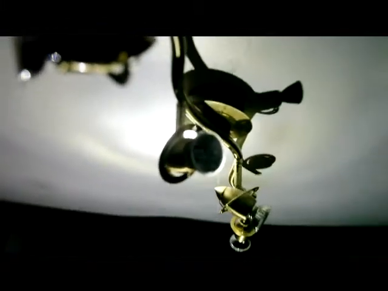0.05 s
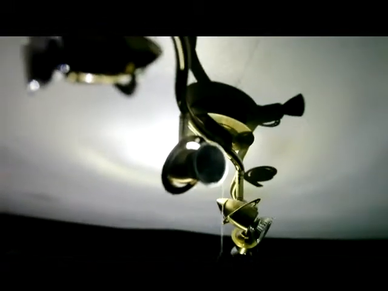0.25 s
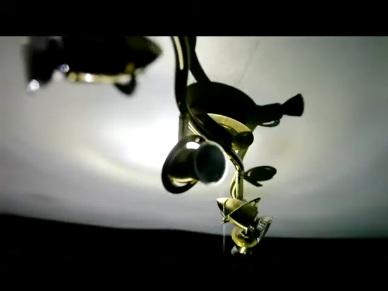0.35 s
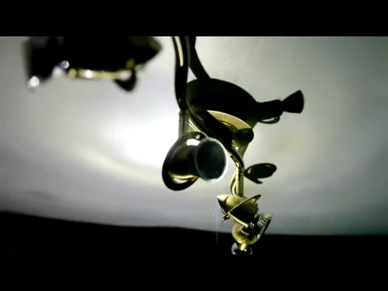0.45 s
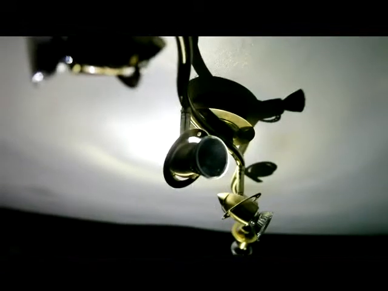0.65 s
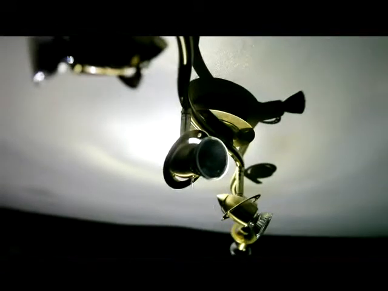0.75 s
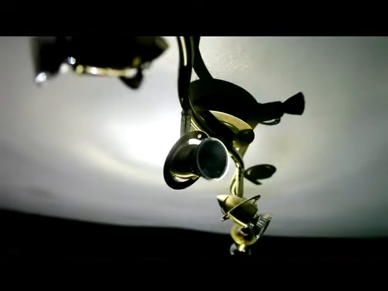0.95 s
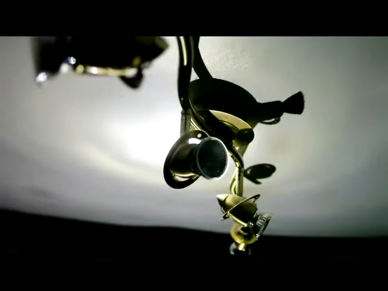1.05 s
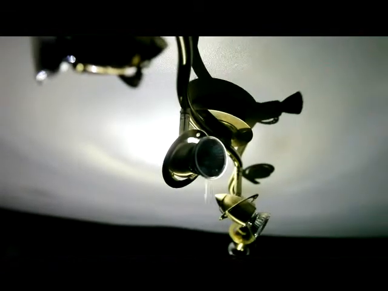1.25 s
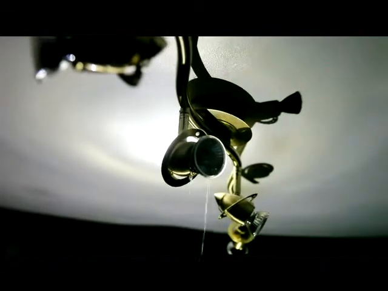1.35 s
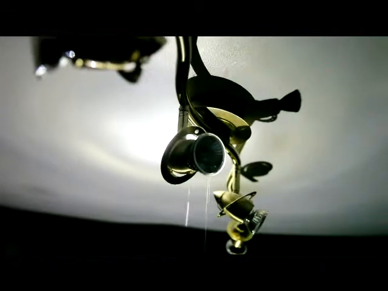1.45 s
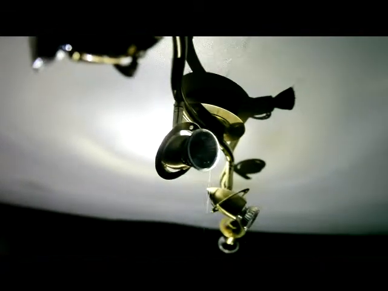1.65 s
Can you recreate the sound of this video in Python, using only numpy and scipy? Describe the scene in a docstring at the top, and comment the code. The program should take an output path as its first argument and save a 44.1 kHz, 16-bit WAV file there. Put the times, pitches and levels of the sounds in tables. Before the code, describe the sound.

Water splats unevenly onto a hard surface, heard nearby in a small, slightly echoing room. Light spatter builds to loud splashes, a single ringing smack and one more gush, ending in small ticking drips over soft room noise.

```python
"""Water spatters onto a hard surface in a small bare room, leaking from a ceiling lamp.
Gushes break into clouds of droplets, some with a dull thump or a hollow ring. One fat drop smacks
down and sets the surface ringing; small drips tick towards the end. An automatic gain control
ducks after each loud splash and lets the room noise creep back."""
import sys
import numpy as np
from scipy import signal
from scipy.fft import rfft, irfft, next_fast_len
from scipy.io import wavfile
from scipy.ndimage import uniform_filter1d

SR = 44100
rng = np.random.default_rng(int(sys.argv[2]) if len(sys.argv) > 2 else 0)


def unload_wav(signal):
    """Save mono or channel-first audio to the path in sys.argv[1] as 16-bit WAV at rate SR, clipped to [-1, 1]."""
    wavfile.write(
        sys.argv[1],
        SR,
        np.round(np.clip(np.atleast_2d(signal).T, -1, 1) * 32767).astype(np.int16),
    )


N = 74970
T = np.arange(N) / SR
EVENT_T = T[:N // 2]
BASS_HZ, BODY_HZ, BITE_HZ, SIZZLE_HZ = 174, 800, 3200, 11300

# Spray spectrum: freq_hz, density_db
SPRAY_SPECTRUM = [(20, -33), (70, -20), (150, -10.5), (290, -12), (480, -5.5), (750, -9), (1100, -5.5),
                  (1600, -4.5), (2400, -4), (3600, -2.5), (5500, -6), (7600, -7.5), (9500, -18.5),
                  (12000, -27), (15500, -40.5)]
# Gushes: start_s, length_s, level_db, bass_db, body_db, sizzle_db, ring_db, bright_hz
GUSHES = [ (0.000, 0.0084, -32.5, 10.5, 1.5, 1.5, -11, 3500), (0.041, 0.2, -36, 7, 13, 2, -14, 2500),
          (0.145, 0.012, -42.5, 8, 7, 3.5, -17, 4500), (0.162, 0.053, -32, 12, 6, 3.5, -32, 2160),
          (0.207, 0.021, -31, 4, 4.5, -0.5, -27, 3200), (0.237, 0.048, -36.5, 12, 5.5, 4, -20, 4100),
          (0.328, 0.021, -37, 2.5, 11, -5, -14, 2110), (0.369, 0.033, -29, 10.5, -4.5, -4, -6, 4230),
          (0.395, 0.017, -18, -3, 5, -3.5, -28, 2550), (0.408, 0.032, -12, -0.5, 4, -1.5, -12, 3130),
          (0.451, 0.016, -7, 2.5, -0.5, 0.5, -8, 2870), (0.4669, 0.0071, -1, -13, -18, -6.5, -9, 4200),
          (0.507, 0.0035, -11, -31, -2, 1, -17, 3320), (0.534, 0.0071, -3.5, -16.5, -3.5, 3, -30, 5860),
          (0.665, .055, -28.5, 18, 14, -2, -8.5, 2500), (1.031, 0.019, -33.5, -1, 10, -2.5, -9, 2300),
          (1.063, 0.077, -29, 11, 13.5, -2, -12, 2980), (1.108, 0.015, -11, 1, -3, 2, -17, 5230),
          (1.124, 0.0082, -9.5, -2, -3, -1.5, -29, 4340), (1.15, 0.023, -7, 7.5, 3.5, 13.5, -2.5, 6000),
          (1.179, .030, -14, -0.5, 5, -7, -37, 3200), (1.648, 0.024, -49, 9, 0, 2, -6, 7000),
          (1.668, .040, -45, 16, 10, -2, -10, 2140)]

def splashes(direct_db=-2, bright_db=5, bright_ratio=1.43):
    """Each gush lands as a droplet cloud that echoes in the room and rings the surface."""
    out = np.zeros(N)
    for start_s, length_s, level_db, bass_db, body_db, sizzle_db, ring_db, bright_hz in GUSHES:
        cloud = droplets(length_s)
        echoed = signal.fftconvolve(cloud, room(direct_db))[:len(cloud)]
        tone = [(BASS_HZ, bass_db), (BODY_HZ, body_db), (BITE_HZ, 0), (SIZZLE_HZ, sizzle_db)]
        peak = [(bright_hz / bright_ratio, 0), (bright_hz, bright_db), (bright_hz * bright_ratio, 0)]
        spray = unit(coloured(echoed, SPRAY_SPECTRUM, tone, peak))
        ring = from_db(ring_db) * surface_ring(cloud)
        add(out, start_s, at_level(spray + ring, level_db))
    return out


def droplets(length_s, rate_per_s=3500, spread_db=3.5):
    """A cloud of tiny impacts that swells, holds for length_s and fades."""
    t = EVENT_T
    sizes = from_db(spread_db * np.minimum(rng.exponential(1, len(t)), 4))
    signs = rng.choice([-1, 1], len(t))
    lands = rng.random(len(t)) < rate_per_s / SR
    attack = np.minimum(t / (0.081 * length_s), 1)
    release = np.exp(-np.maximum(t - length_s, 0) / (0.31 * length_s))
    return sizes * signs * lands * attack * release


# Fat drop spectrum: freq_hz, density_db
SMACK_SPECTRUM = [(40, -34), (150, -13.5), (370, -19.5), (800, -12.5), (1400, -12.5), (2100, -4.5),
                  (3000, -2.5), (4500, -2.5), (7800, -6.5), (9500, -16.5), (12000, -15.5), (15500, -38.5)]

def smack(start_s=0.7257, level_db=2, spray_db=-1.5, ring_db=-1.5):
    """The fat drop lands in one blow, throws a brief spray and rings the surface."""
    out = np.zeros(N)
    blow = room(direct_db=-18)
    spray = from_db(spray_db) * unit(droplets(length_s=0.011))
    splat = unit(coloured(blow + spray, SMACK_SPECTRUM))
    ring = from_db(ring_db) * surface_ring(click())
    add(out, start_s, at_level(splat + ring, level_db))
    return out


# Surface modes: pitch_hz, level_db, t60_s
SURFACE_MODES = [(911, -18, .25), (1949, -9, .12), (2207, -11, .12), (2478, 0, .22), (2645, -9, .14),
                 (2784, -10, .16), (2981, -1.5, .21), (3061, -6, .19), (3558, -11, .2), (3738, -10, .2),
                 (4355, -12, .2), (4872, -14, .23), (5480, -12, .19), (6708, -14, .2)]

def surface_ring(impacts):
    """The hard surface rings brightly where water strikes it."""
    return ringing(impacts, SURFACE_MODES)


# Hollow modes: pitch_hz, level_db, t60_s
HOLLOW_MODES = [(398.6, -7, 0.16), (468, -1, 0.31), (528, -1.5, 0.39), (572, -4, 0.5), (646, -2.5, 0.26),
                (714, -1, 0.19)]
# Hollow rings: start_s, level_db
HOLLOW_HITS = [(0.000, -43.5), (0.455, -19.5), (0.536, -20.5)]

def hollow_rings():
    """Droplets excite a tub-like ring that outlasts the splash."""
    out = np.zeros(N)
    for start_s, level_db in HOLLOW_HITS:
        ring = ringing(droplets(length_s=0.026), HOLLOW_MODES)
        add(out, start_s, at_level(ring, level_db))
    return out


# Tick spectrum: freq_hz, density_db
TICK_SPECTRUM = [(100, -11), (500, -6), (1700, -0.5), (2400, 4.5), (3500, -0.5), (5700, -12), (7500, -7),
                 (9200, -5), (11500, -16), (15500, -26)]
# Ping modes: pitch_hz, level_db, t60_s
PING_MODES = [(2290, 2, 0.057), (2770, -2, 0.024), (3500, -8.5, 0.019)]
# Small drops: start_s, level_db, body_db, sizzle_db
SMALL_DROPS = [(0.997, -45, 4, 4), (1.402, -49.5, 2, -4), (1.4440, -43.5, -5, 12), (1.451, -45, -12, 0.5),
               (1.503, -39.5, 10, 6), (1.591, -51, 10, -14), (1.622, -48.5, 3, -15)]

def drips(ping_db=-7.5):
    """Single small drops land with a sharp tick in the room and a short ping."""
    out = np.zeros(N)
    ping = from_db(ping_db) * ringing(click(), PING_MODES)
    for start_s, level_db, body_db, sizzle_db in SMALL_DROPS:
        tone = [(BODY_HZ, body_db), (BITE_HZ, 0), (SIZZLE_HZ, sizzle_db)]
        tick = unit(coloured(room(direct_db=-4.5), TICK_SPECTRUM, tone))
        add(out, start_s, at_level(tick + ping, level_db))
    return out


# Low booms: start_s, pitch_hz, level_db, t60_s
BOOMS = [(0.160, 46.3, -51, 1), (0.18, 212, -31.5, 0.28), (0.401, 50, -41, .3), (0.408, 145.6, -25.5, 0.19),
         (0.449, 84, -34, 0.81), (0.719, 52.5, -20, 0.089), (0.722, 156, -16.5, 0.26),
         (1.026, 139.5, -35, 0.85), (1.142, 143, -20, 0.3), (1.185, 46, -30.5, 0.5)]

def thumps(rise_s=0.007):
    """Heavier masses of water land with a low, damped boom."""
    out = np.zeros(N)
    for start_s, pitch_hz, level_db, t60_s in BOOMS:
        envelope = (1 - np.exp(-T / rise_s)) * decay(T, t60_s)
        add(out, start_s, from_db(level_db) * envelope * np.sin(2 * np.pi * pitch_hz * T))
    return out


# Room decay: freq_hz, t60_s
ROOM_DECAY = [(100, 0.61), (260, .38), (600, 0.35), (1800, 0.28), (4800, 0.26), (8000, 0.26), (13000, 0.14)]

def room(direct_db, bands=10, build_s=0.00091):
    """Response from one landing spot: direct sound, then dense reflections dying band by band."""
    t = EVENT_T
    white = rfft(rng.standard_normal(len(t)))
    freq_hz = np.arange(len(white)) * SR / len(t)
    band_position = at_hz([(80, 0), (16000, bands - 1)], freq_hz + 1)
    tail = np.zeros(len(t))
    for k, centre_hz in enumerate(np.geomspace(80, 16000, bands)):
        weight = np.maximum(1 - abs(band_position - k), 0)
        tail += irfft(white * weight, len(t)) * decay(t, at_hz(ROOM_DECAY, centre_hz))
    return unit(tail * (1 - np.exp(-t / build_s))) + from_db(direct_db) * click()


# Room noise spectrum: freq_hz, density_db
NOISE_SPECTRUM = [(20, -54), (45, -12), (85, -17.5), (130, 2), (165, -10.5), (200, 2), (270, -18),
                  (410, -7), (600, -15), (950, -20.5), (1250, -9.5), (1700, -15.5), (2300, -11),
                  (3600, -18.5), (5700, -24), (8000, -24), (11000, -37), (15500, -39)]

def background(noise_db=-43, whine_hz=15671, whine_db=-62):
    """Steady room noise and a thin electrical whine."""
    noise = np.sqrt(N) * unit(coloured(rng.standard_normal(N), NOISE_SPECTRUM))
    return from_db(noise_db) * noise + from_db(whine_db) * np.sin(2 * np.pi * whine_hz * T)


def ringing(impacts, modes):
    """Impacts drive one damped resonator per mode, alternating in sign; energy 1."""
    out = np.zeros(len(impacts))
    for k, (pitch_hz, level_db, t60_s) in enumerate(modes):
        radius = decay(1 / SR, t60_s)
        feedback = [1, -2 * radius * np.cos(2 * np.pi * pitch_hz / SR), radius ** 2]
        out += from_db(level_db) * unit(signal.lfilter([0, (-1) ** k], feedback, impacts + 1e-18))
    return unit(out)


def coloured(x, *curves):
    """Minimum-phase filter from the summed dB curves."""
    size = 2 * next_fast_len(len(x))
    freq_hz = np.arange(size // 2 + 1) * SR / size
    gain_db = sum(at_hz(curve, freq_hz) for curve in curves)
    cepstrum = irfft(np.log(from_db(gain_db)))
    cepstrum[1:size // 2] *= 2
    cepstrum[size // 2 + 1:] = 0
    return irfft(rfft(x, size) * np.exp(rfft(cepstrum)))[:len(x)]


def click():
    """A single impact."""
    return 1.0 * (EVENT_T == 0)


def decay(t, t60_s):
    """Fall of 60 dB per t60_s."""
    return np.exp(-np.log(1000) * t / t60_s)


def from_db(db):
    """Decibels to gain."""
    return 10 ** (np.asarray(db) / 20)


def unit(x):
    """Scale to energy 1."""
    return x / np.sqrt(np.sum(x ** 2) + 1e-20)


def at_level(x, level_db, window_s=0.05):
    """Scale to the energy of window_s of sound at an RMS of level_db."""
    return from_db(level_db) * np.sqrt(window_s * SR) * unit(x)


def at_hz(points, freq_hz):
    """Read a table on a log-frequency axis."""
    knots_hz, values = np.transpose(points)
    return np.interp(np.log(np.maximum(freq_hz, 1)), np.log(knots_hz), values)


def add(out, start_s, x):
    """Mix x in at start_s."""
    i = int(start_s * SR)
    out[i:i + len(x)] += x[:N - i]


def scene():
    """All sources, mono."""
    return (splashes() + smack() + hollow_rings() + drips() + thumps() + background())[None]


def auto_gain(x, threshold_db=-24, slope=0.57, recover_db_per_s=10,
              sense_s=0.0047, attack_s=0.0011, look_ahead_s=0.00041):
    """Gain that ducks fast on loud sound and recovers slowly."""
    power = uniform_filter1d(x ** 2, int(sense_s * SR))
    level_db = 10 * np.log10(np.maximum(power, 1e-12))
    duck_db = slope * np.maximum(level_db - threshold_db, 0)
    recovery_db = recover_db_per_s * T
    held_db = np.maximum.accumulate(duck_db + recovery_db) - recovery_db
    early_db = np.interp(T + look_ahead_s, T, held_db)
    pole = np.exp(-1 / (attack_s * SR))
    return from_db(-signal.lfilter([1 - pole], [1, -pole], early_db))


def record(dry, cutoff_hz=16200):
    """Gain control, soft clipping, steep low-pass."""
    clipped = np.tanh(dry * auto_gain(dry[0]))
    lowpass = signal.ellip(10, 0.2, 80, cutoff_hz, fs=SR, output="sos")
    return signal.sosfilt(lowpass, clipped)


dry = scene()
out = record(dry)
unload_wav(out)
```